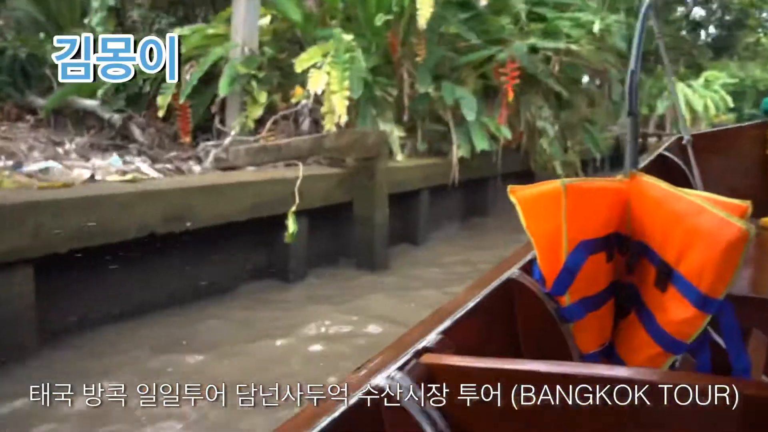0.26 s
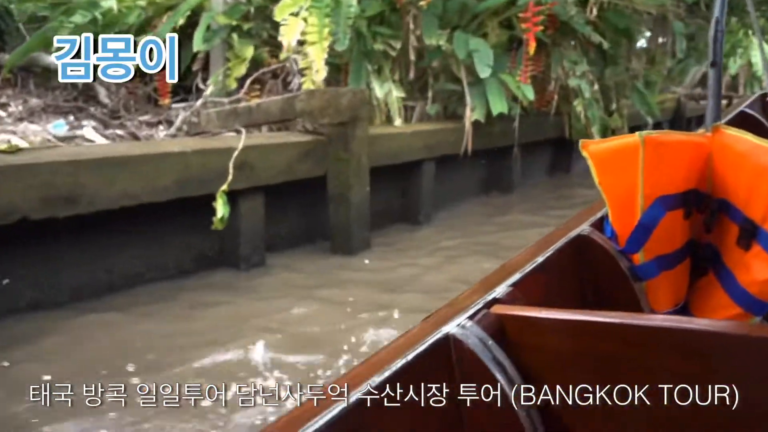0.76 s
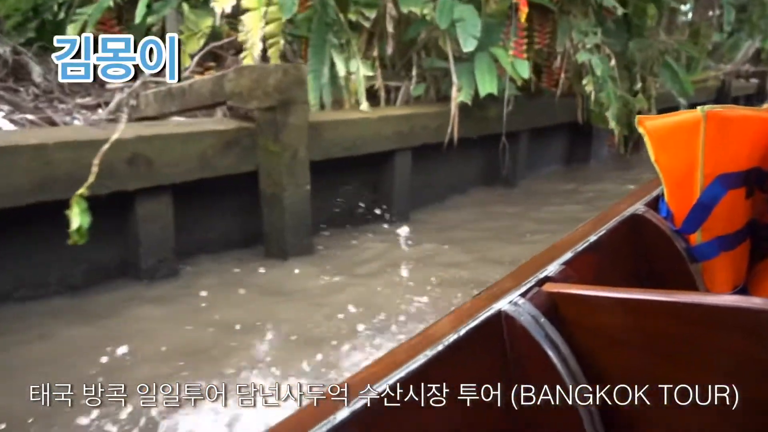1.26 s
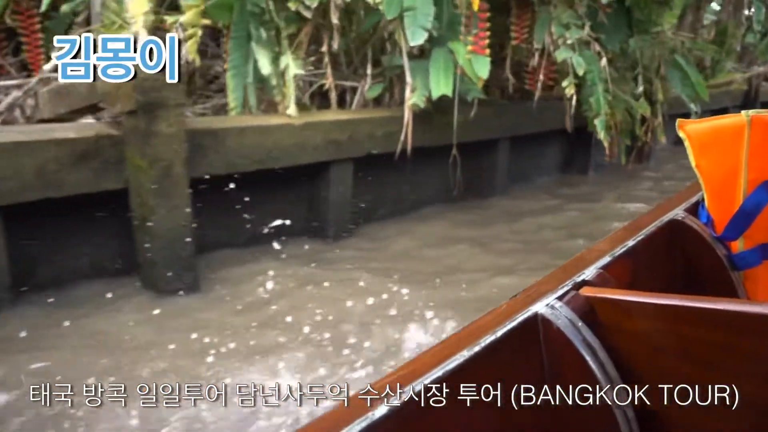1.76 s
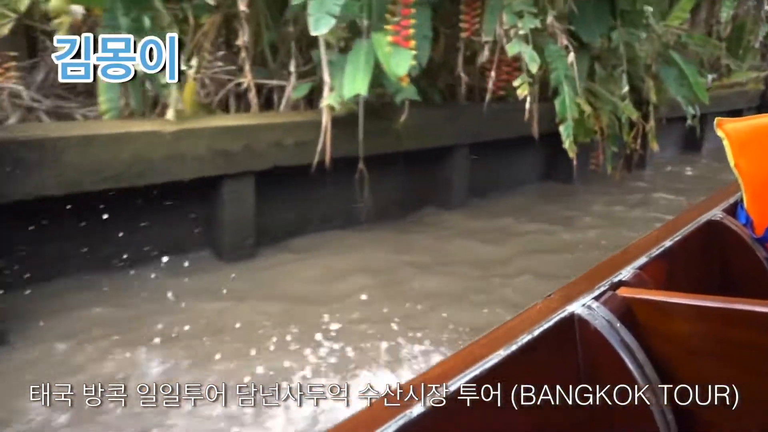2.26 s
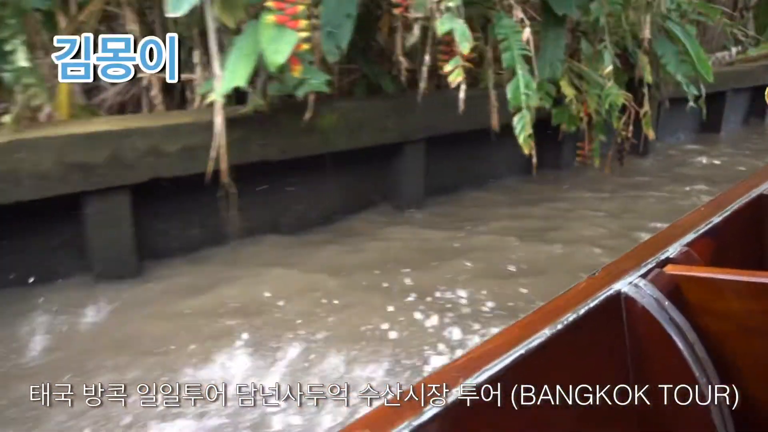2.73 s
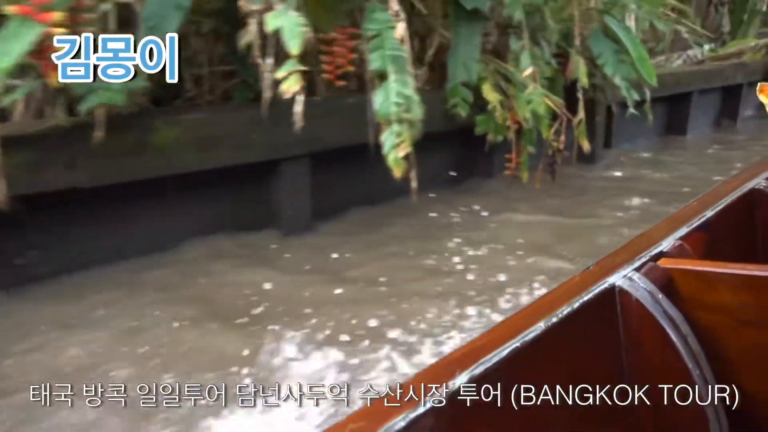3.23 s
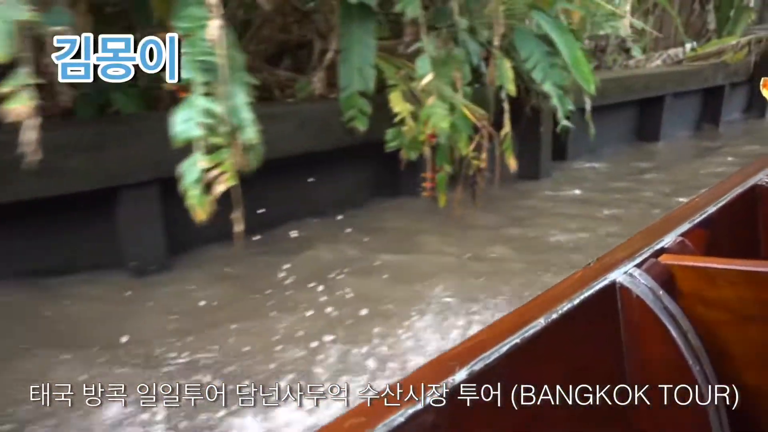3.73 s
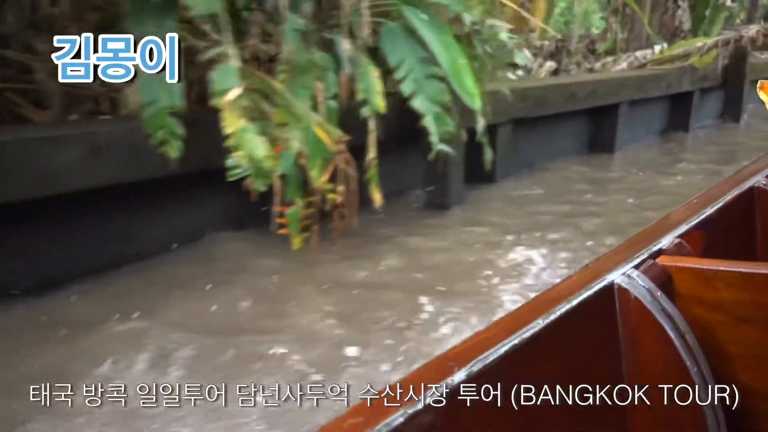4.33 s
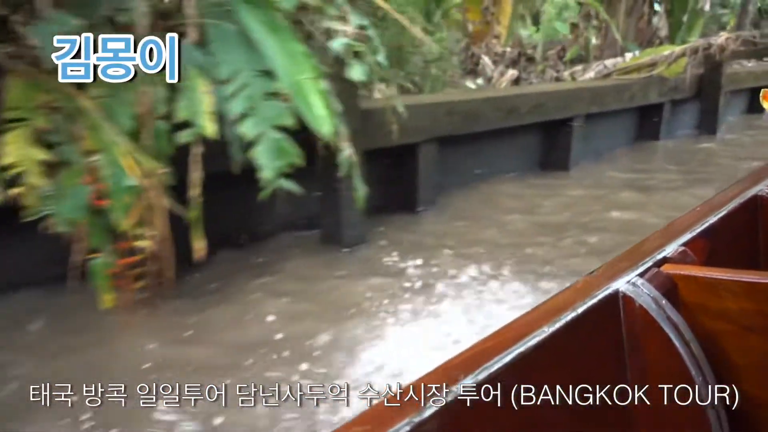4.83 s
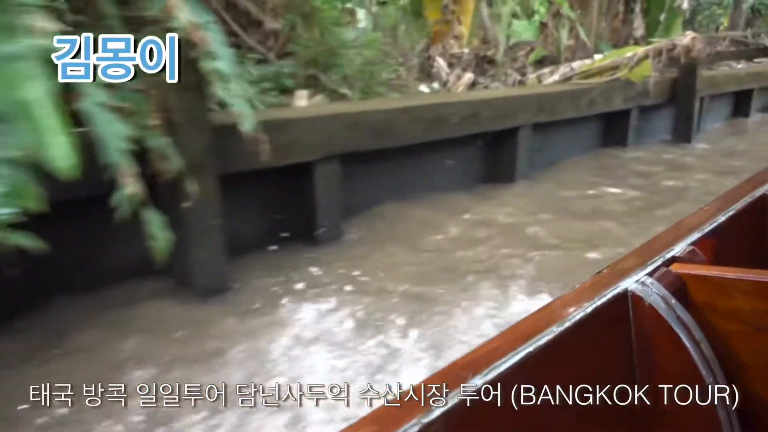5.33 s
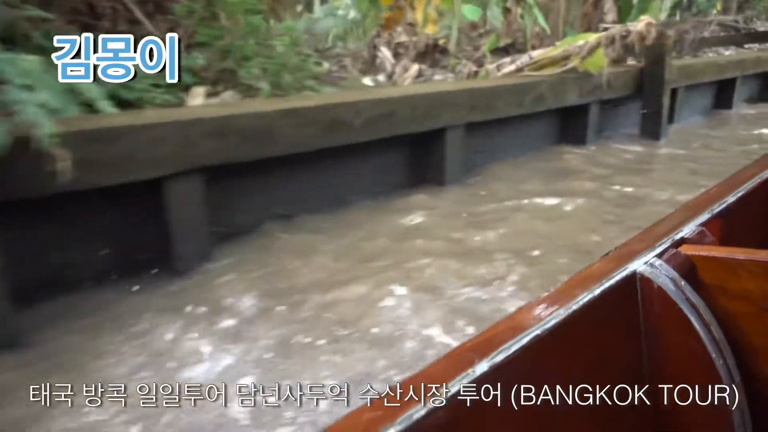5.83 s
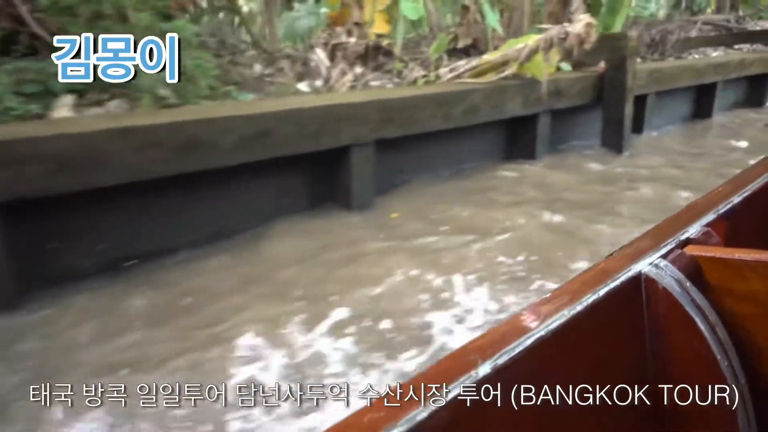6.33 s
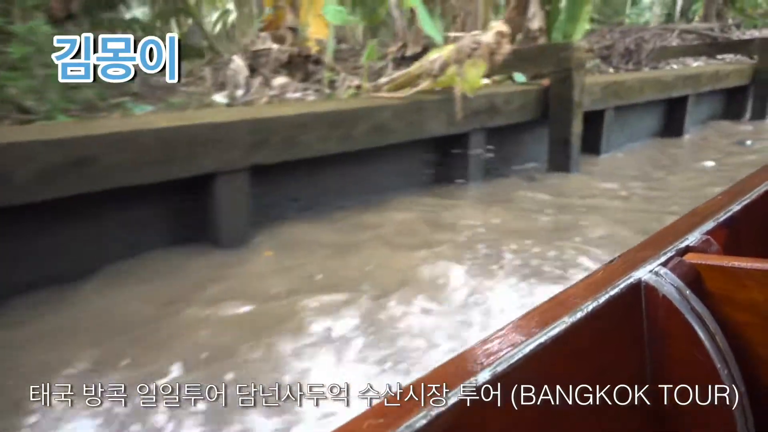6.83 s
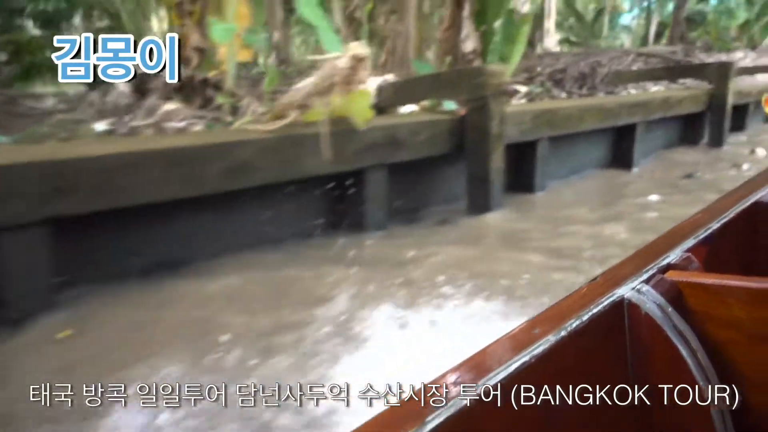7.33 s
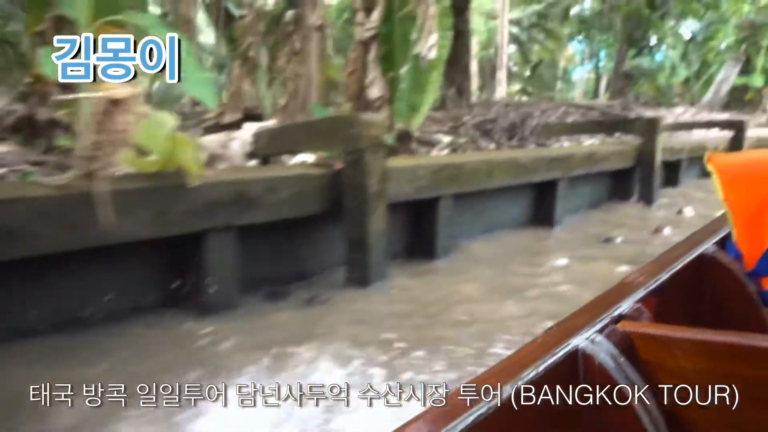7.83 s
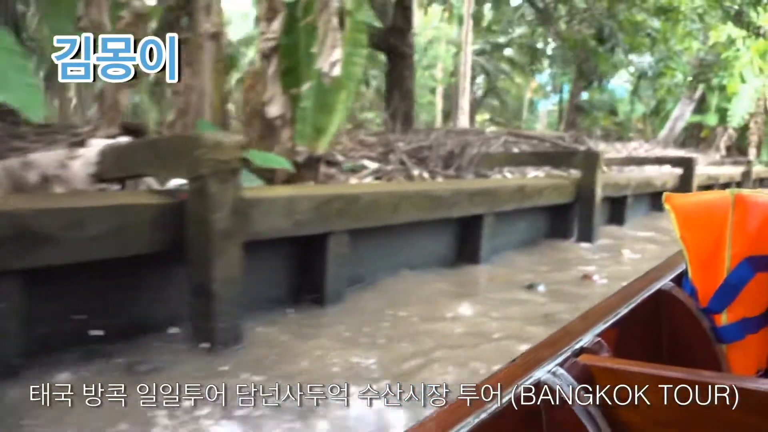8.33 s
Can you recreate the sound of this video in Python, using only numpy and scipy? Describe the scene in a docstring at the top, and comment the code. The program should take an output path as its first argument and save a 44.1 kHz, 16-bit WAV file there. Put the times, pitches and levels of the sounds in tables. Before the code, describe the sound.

Continuous engine noise heard from on board: deep uneven throbbing, hoarse midrange exhaust and a patchy hiss of water against the hull. Small sudden dropouts and surges make it flutter, while low gusts buffet the close handheld microphone. It eases around six seconds, swells from seven to eight with sharp spits of spray, then settles slightly. Top treble is muffled after the opening half second.

```python
"""An engine drones in low orders under a rough exhaust roar, as a long open boat runs along a walled canal.
The drone is a stack of wavering near sines; the roar is pipe-coloured noise, puffed at each firing.
The bow wave rushes and spits beside the hull as noise and chirped droplets, and the head wind buffets
the two ports of a small microphone as low noise. The top treble is open at first and closes within
half a second."""
import sys
import numpy as np
from scipy import signal
from scipy.io import wavfile
from scipy.ndimage import uniform_filter1d

SR = 44100
rng = np.random.default_rng(int(sys.argv[2]) if len(sys.argv) > 2 else 0)


def to_wav(sig):
    """Store sig (one row per channel, or 1-D mono) as 16-bit WAV at the path in sys.argv[1].

    Samples outside -1..1 are clipped; the rate is SR.
    """
    pcm = np.clip(np.atleast_2d(sig), -1, 1) * 32767
    pcm = np.round(pcm).astype(np.int16)
    wavfile.write(sys.argv[1], SR, pcm.T)  # frames by channels


def voltage_ratio(level):
    """Linear amplitude factor for a level in decibels (scalar or array-like)."""
    return 10 ** (np.asarray(level, float) / 20)


N = 377937  # length in samples


def evened(x):
    """Scales to rms 1."""
    return x / np.sqrt(np.mean(np.abs(x) ** 2) + 1e-20)


def read(points, hz):
    """Columns of a table over log frequency."""
    f, *values = np.transpose(points)
    return [np.interp(np.log(hz + 1), np.log(f + 1), v) for v in values]


def play(rows):
    """Columns of a curve over time, one value a sample."""
    s, *values = np.transpose(rows)
    return [np.interp(np.arange(N) / SR, s, v) for v in values]


def wander(seconds):
    """Smooth random drift of rms 1, from noise averaged twice over the given time."""
    width = round(seconds * SR)
    return evened(uniform_filter1d(uniform_filter1d(rng.standard_normal(N), width), width))


def bumps(rows):
    """Sum of bell-shaped bumps in dB."""
    t = np.arange(N) / SR
    return sum(db * np.exp(-((t - s) / max(half_s, .008)) ** 2) for s, db, half_s in rows)


def placed(pair, level_db, pan_db):
    """Level and side of a stereo layer; pan is left minus right."""
    return evened(pair) * voltage_ratio(level_db + np.array([pan_db / 2, -pan_db / 2]))


def tilted(pair, bright_db, pivot_hz, size=1024):
    """Turns the spectrum about a pivot by a moving slope in dB per octave, up to two octaves away."""
    hz, t, z = signal.stft(pair, SR, nperseg=size)
    octaves = np.log2(np.clip(hz / pivot_hz, 1 / 4, 4))
    slope_db = np.interp(t, np.arange(N) / SR, bright_db)
    return signal.istft(z * voltage_ratio(np.outer(octaves, slope_db)), SR, nperseg=size)[1][:, :N]


# The port pair. Each row: frequency in Hz, left-right likeness from 0 to 1, lead of the left in radians.
PORT_PAIR = [(20, .85, .1), (40, .66, .4), (60, .5, 1.2), (90, .55, 1.7), (170, .58, 1.9), (250, .5, 1.4),
             (400, .66, .6), (850, .38, .45), (1200, .1, 1.8), (2000, .32, 3.1), (2450, .3, 3.2),
             (2750, 0, 5.5), (3800, .24, 6.5), (4800, .2, 3.9), (5500, .05, 3.9)]
# The ports differ in colour. Each row: frequency in Hz, left minus right in dB.
PORT_COLOUR = [(20, 1), (60, -1), (130, -1), (200, -1.5), (320, 0), (700, 0.7), (1500, 0.5), (2400, 0.1),
               (3500, 0), (4400, 2.5), (5300, 1.1)]


def ports(left, other, hz):
    """The right port hears part of the same spectrum a little later, and part its own."""
    same, lead = (v[:, None] for v in read(PORT_PAIR, hz))
    same = np.clip(same, 0, 1)
    lean = voltage_ratio(read(PORT_COLOUR, hz)[0][:, None] / 2)
    right = same * np.exp(-1j * lead) * left + np.sqrt(1 - same ** 2) * other
    return np.array([left * lean, right / lean])


def noise(shape, size, patchy_db, patch_hz, patch_s):
    """Random short-time spectra at both ports with drifting loud and soft patches."""
    hop, hz = size // 4, np.fft.rfftfreq(size, 1 / SR)
    a, b, c, d, patches = rng.standard_normal((N // hop + 5, len(hz), 5)).T
    patches = uniform_filter1d(patches, max(round(patch_hz * size / SR), 1), 0)
    patches = evened(uniform_filter1d(patches, max(round(patch_s * SR / hop), 1), 1))
    z = ports(a + 1j * b, c + 1j * d, hz) * shape(hz)[:, None] * voltage_ratio(patchy_db * patches)
    return evened(signal.istft(z, nperseg=size, noverlap=size - hop)[1][:, :N])


# A cycle is two turns of the crank.
# Each row: time in seconds, engine cycle in Hz, base level of the 3rd multiple in dB rms.
ENGINE_SPEED = [(0, 12.7, -43), (.33, 12.6, -23), (.67, 13.1, -25), (1.1, 12.6, -23.5), (1.55, 12.8, -27.5),
                (1.9, 12.5, -29.5), (2.3, 12.8, -24), (2.8, 13, -25.5), (3.3, 12.3, -26), (3.8, 12.3, -33),
                (4.4, 12.2, -25), (4.9, 12, -26.5), (5.5, 12.6, -27.5), (6.3, 13.5, -29),
                (7.1, 13.3, -27.5), (7.55, 12.5, -31), (8, 12.9, -27), (8.57, 13.7, -24)]


def engine():
    """Adds up the speed into a running count of engine cycles, with the base level of the drone."""
    speed_hz, drone_db = play(ENGINE_SPEED)
    return np.cumsum(speed_hz) / SR, drone_db


# The low orders. Each row: multiple of the engine cycle, level in dB against the 3rd.
ORDERS = [(1, -10), (2, -6), (3, 0), (4, -7), (5, -7), (6, -11), (7, -8), (8, -7), (10, -14), (12, -14),
          (16, -12), (20, -16)]
PORT_SWAY = 0.42  # rms radians by which the orders drift between the ports


def drone(cycles, level_db):
    """The low orders shake the hull: near sines that waver, the left port leading."""
    out = np.zeros((2, N))
    sways = PORT_SWAY * np.array([wander(.1), wander(0.088), wander(0.087)])  # shared among the orders
    mean_hz = cycles[-1] * SR / N
    for i, (multiple, db) in enumerate(ORDERS):
        lead = read(PORT_PAIR, multiple * mean_hz)[1] + sways[i % len(sways)]
        turns = multiple * cycles + rng.random() + .045 * multiple * wander(.07)
        phase = 2 * np.pi * turns - np.array([np.zeros(N), lead])
        out += voltage_ratio(level_db + db + 2.2 * wander(.1)) * np.sqrt(2) * np.cos(phase)
    return out


# The roar. Each row: time in seconds, base level in dB rms, base brightness in dB per octave.
ROAR_CURVE = [(0, -18.5, 1.5), (.09, -19, 1.5), (.16, -20, 3), (.27, -21, 1), (.4, -19, 1), (1.1, -21.5, 2),
              (1.45, -26.5, -2), (1.75, -23.5, -0.5), (2.0, -22.5, -1), (2.4, -22, 2), (2.6, -24.5, -0.5),
              (3.15, -20.5, .5), (3.6, -26, -0.5), (4.0, -21.5, 1), (4.45, -20.5, 1.5), (4.7, -23, -1),
              (5.05, -20, 1), (5.6, -21.5, -1), (5.85, -27, 0.5), (6.0, -31, 2.5), (6.25, -28.5, -0.5),
              (6.5, -28, 1.5), (6.85, -22, 0.5), (7.4, -19, 1.5), (7.65, -18.5, 1), (7.8, -17, -0.3),
              (8.05, -18, -0.5), (8.3, -21, 1), (8.57, -22.5, 1.5)]
# Broad colour of the gas. Each row: frequency in Hz, relative density in dB per Hz.
GAS_COLOUR = [(120, -27), (220, -5), (320, 1), (420, -3.5), (650, -4), (900, -10), (1130, -13.5),
              (1250, -13.5), (1800, -21.5), (3000, -37)]
# Pipe resonances. Each row: frequency in Hz, width at half height in Hz, added peak in dB against the gas.
PIPE_PEAKS = [(247, 31, -11), (335.3, 13, -6), (385, 24, -5.5), (467.6, 16, -8.5), (610, 27, -21),
              (850, 97, -7.5), (920, 35, -6.5), (1070, 55, 0.5)]
# The roar surges. Each row: peak time in seconds, rise in dB, half length in seconds.
ROAR_SURGES = [(0.207, 3.5, 0.063), (0.724, 4, 0.055), (0.914, 5, 0.036), (1.055, 2.0, 0.05),
               (1.576, 1.5, 0.03), (1.682, 3, 0.027), (2.63, 3, 0.031), (4.19, 3, 0.071),
               (4.457, 5.5, 0.048), (4.993, 3, 0.055), (5.121, 4, 0.054), (5.436, 3.5, 0.036),
               (5.563, 2.5, 0.032), (6.033, 1.5, 0.03), (6.295, 3, 0.045), (6.518, 1, 0.028),
               (6.815, 2, 0.042), (6.923, 3, 0.04), (7.105, 3.5, 0.029), (7.54, 1, 0.019),
               (7.713, 1.5, 0.055), (7.82, 1, 0.08), (7.942, 2, 0.022), (8.121, 1, 0.028), (2.39, 2, .04),
               (2.83, 2, .04), (3.17, 2, .03), (8.55, 2, .04)]
CYLINDERS = 4
ROAR_PAN_DB, ROAR_DRIFT_DB, ROAR_DRIFT_S = 1.24, 0.6, 0.046  # left minus right, its rms drift and pace
SURGE_TILT_DB = -0.24  # change of brightness per octave for each dB of a surge
ROAR_DIP = 0.79  # share of each sudden dip


def exhaust(cycles, dip_db):
    """Turbulent gas puffed out at each firing, coloured by the pipe; surges are darker."""
    def colour(hz):
        peaks = sum(voltage_ratio(db) / (1 + (2 * (hz - f) / width) ** 2) for f, width, db in PIPE_PEAKS)
        return voltage_ratio(read(GAS_COLOUR, hz)[0]) * (1 + peaks)
    surge_db = bumps(ROAR_SURGES)
    level_db, bright_db = play(ROAR_CURVE)
    level_db = level_db + surge_db - ROAR_DIP * dip_db
    bright_db = bright_db + SURGE_TILT_DB * surge_db
    pan_db = ROAR_PAN_DB + ROAR_DRIFT_DB * wander(ROAR_DRIFT_S)
    firing = CYLINDERS * cycles + 0.16 * wander(0.024)
    burns = voltage_ratio(1.5 * rng.standard_normal(round(firing.max()) + 2))  # uneven from firing to firing
    strength = burns[np.floor(abs(firing)).astype(int)]
    puffs = uniform_filter1d(1 + 0.79 * strength * np.exp(-(firing % 1) / 0.85), size=40)
    gas = noise(colour, size=2048, patchy_db=0.6, patch_hz=120, patch_s=.09)
    return placed(tilted(gas, bright_db, pivot_hz=486) * puffs, level_db, pan_db)


# Brief swells of one note, some low like the drone, some higher.
# Each row: middle in seconds, peak in dB, pitch in Hz, length in seconds between the points at 37 % of the peak.
NOTE_SWELLS = [(2.1, -23.5, 26, 0.36), (2.95, -26, 78, .2), (5.35, -23, 51, 0.32), (5.5, -22, 97, .2),
               (5.78, -21, 40, .14), (5.92, -23, 40, .1), (6.13, -19, 50, .07), (6.35, -20, 55, .09),
               (5.95, -26, 23, 0.28), (6.6, -18, 43, 0.18), (6.9, -19, 31, 0.27), (6.9, -21, 43, 0.22),
               (7.08, -21, 60, .2), (7.25, -20.5, 45, 0.24), (8.4, -26, 56, 0.22), (4.35, -19, 24.64, 0.56),
               (6.903, -21, 21.56, 0.3), (0.92, -23, 461.5, 0.13), (1.07, -20, 254.6, 0.11),
               (3.927, -27.5, 876, 0.088), (4.433, -26.5, 331.6, 0.099), (4.437, -26.5, 1063, 0.095),
               (5.046, -22.5, 330.6, 0.11), (5.06, -27.5, 850, 0.13), (5.442, -22, 515, 0.076),
               (6.129, -26, 115, .15), (7.53, -25, 300, .06), (7.72, -23, 645, 0.08), (7.2, -26, 835, 0.1),
               (7.37, -25.5, 835, .13), (7.33, -28, 920, .07), (7.36, -32, 1150, .14),
               (7.31, -25, 385, .08), (7.535, -27, 1005, .06), (7.71, -23, 245, .08), (6.93, -23, 365, .07),
               (0.72, -23, 600, .07), (7.655, -21, 385, 0.09), (7.61, -22, 295, .06), (8.02, -22, 385, .05),
               (7.93, -22, 350, .06), (7.842, -15.5, 512, 0.075), (8.052, -16, 102, 0.2)]


def note_swells():
    """Short sines of one note each, fading in and out, the left port leading."""
    out = np.zeros((2, N))
    for s, db, hz, length in NOTE_SWELLS:
        at = np.arange(max(round((s - 2 * length) * SR), 0), min(round((s + 2 * length) * SR), N))
        lead = np.array([[0], [read(PORT_PAIR, hz)[1]]])
        swell = np.exp(-(2 * (at / SR - s) / length) ** 2)
        out[:, at] += voltage_ratio(db) * swell * np.sin(2 * np.pi * hz * at / SR - lead)
    return out


# Roar and rush drop away suddenly and creep back.
# Each row: time in seconds, depth in dB before each layer takes its share, recovery time constant in seconds.
SUDDEN_DIPS = [(0.1, 6.5, 0.081), (0.222, 5, 0.05), (.31, 2, .03), (0.355, 4, 0.037), (0.551, 7, 0.047),
               (0.787, 7, 0.06), (1.119, 8.5, 0.055), (1.365, 3, .04), (1.485, 2, 0.032), (1.605, 8, 0.032),
               (1.688, 3, 0.05), (2.482, 5.5, 0.074), (2.554, 6, 0.07), (2.655, 3, .04), (2.858, 1, 0.056),
               (2.97, 3.5, 0.073), (3.2, 6.5, 0.066), (3.498, 5.5, 0.067), (3.53, 0.5, 0.049),
               (3.961, 3.5, 0.069), (4.193, 2, 0.34), (4.619, 7, 0.066), (4.818, 9, 0.07),
               (5.147, 5, 0.068), (5.273, 4.5, 0.054), (5.359, 3.5, 0.07), (5.628, 5, 0.045),
               (6.318, 6, 0.08), (6.36, 3.5, 0.091), (6.41, 2, 0.077), (6.935, 3.5, 0.08),
               (6.978, 4.5, 0.051), (7.12, 8, 0.04), (7.15, 5.5, 0.023), (7.23, 7, 0.038),
               (7.448, 6, 0.037), (7.581, 3, 0.055), (7.65, 3, .04), (7.872, 4.5, 0.067),
               (8.147, 3.5, 0.05), (8.435, 3, .04)]
DIP_HALF_FALL_S = 0.0082


def dips():
    """Depth in dB: a quick fall, then a slow exponential return."""
    depth_db = np.zeros(N)
    for s, db, back_s in SUDDEN_DIPS:
        after = np.arange(N) / SR - s
        fall = np.clip(.5 + after / (2 * DIP_HALF_FALL_S), 0, 1)
        depth_db += db * fall * np.exp(-np.maximum(after, 0) / max(back_s, .01))
    return depth_db


def droplet(hz, cycles):
    """A short rising chirp of a few cycles, as a drop bursting."""
    t = np.arange(round(cycles * SR / hz)) / SR
    return np.hanning(len(t)) * np.sin(2 * np.pi * hz * t * (1 + 0.11 * t * hz / cycles))


# The bow wave. Each row: time in seconds, base level in dB rms, base brightness in dB per octave.
WAVE_CURVE = [(0, -25, -3.5), (.08, -25.5, -4), (.13, -26, -2), (.2, -34, -1.5), (.28, -35, -0.5),
              (.5, -28, 0), (1.1, -27.5, -0.5), (1.45, -33, 0.5), (2.1, -32.5, -3.5), (2.4, -32, 4),
              (2.7, -31.5, -2), (3.2, -32, -3), (3.7, -31.5, 1), (4.15, -28.5, 0.5), (5.05, -26.5, 1.5),
              (5.45, -31.5, -1.5), (6.0, -33.5, 0.5), (6.9, -24.5, 0.5), (7.4, -25.5, -2),
              (7.85, -25.5, -2), (8.57, -31.5, 1.5)]
# Colour of the rush. Each row: frequency in Hz, relative density in dB per Hz.
RUSH_COLOUR = [(400, -14.5), (900, 3), (1500, 10.5), (1900, 7.5), (2300, 6.5), (2650, 6), (3000, 5),
               (4000, 2.5), (5200, 3.5), (6500, -7), (8000, -18), (12000, -20), (14000, -22), (16000, -29)]
WAVE_DIP, DIP_TILT_DB = 1.73, 0.25  # share of each dip, dulling in dB per octave for each dB of its depth


def water(dip_db):
    """A patchy rush of noise with a fizz of randomly bursting droplets on top."""
    level_db, bright_db = play(WAVE_CURVE)
    level_db, bright_db = level_db - WAVE_DIP * dip_db, bright_db - DIP_TILT_DB * dip_db
    rush = noise(lambda hz: voltage_ratio(read(RUSH_COLOUR, hz)[0]), size=512, patchy_db=1.26, patch_hz=600, patch_s=.04)
    fizz = np.zeros((2, N))
    for hz in np.geomspace(900, 5400, num=16):
        bursts = rng.random((2, N)) < 60. / SR  # about 60 a second at each pitch and port
        sizes = voltage_ratio(2.8 * np.minimum(rng.exponential(1, (2, N)), 5)) * bursts
        fizz += signal.oaconvolve(sizes, droplet(hz, cycles=4.76)[None], axes=1)[:, :N]
    wave = tilted(rush + voltage_ratio(-9.0) * evened(fizz), bright_db, pivot_hz=2950)
    return placed(wave, level_db, np.zeros(N))


# Sharp spits of spray and lower slaps of water near the microphone.
# Each row: start in seconds, peak in dB, starting pitch in Hz, left minus right in dB.
SPRAY_SPITS = [(2.4715, -22, 4793, 0), (2.9575, -23, 2240, 1), (4.5984, -34, 2902, 7),
               (4.7605, -14.5, 675, 1), (6.0955, -22, 669.6, .5), (7.691, -14, 638.4, 0),
               (7.8495, -11, 4130, 3)]


def spits():
    """Single drops that burst close by, each one chirp."""
    out = np.zeros((2, N + SR))
    for s, db, hz, pan_db in SPRAY_SPITS:
        drop = droplet(hz, cycles=3.9)
        out[:, round(s * SR):][:, :len(drop)] += voltage_ratio(db + np.array([[pan_db / 2], [-pan_db / 2]])) * drop
    return out[:, :N]


# Short broad bands of noise, each sliding in pitch.
# Each row: start in seconds, length in seconds, level in dB rms before the fades, first and last pitch in Hz.
NOISE_BANDS = [(0, .105, -31, 3000, 2800), (0, .105, -28.5, 1950, 1800), (.115, .11, -33, 1800, 1500),
               (.23, .13, -35, 1700, 1600), (.11, .11, -35, 2700, 2400), (0, .105, -27.5, 1050, 950),
               (7.5, .3, -26.5, 880, 900), (4.95, .22, -29, 1000, 890), (8, .25, -28, 750, 640)]
BAND_WIDTH, BAND_RISE_S = 0.43, .02  # width of each pole as a share of the last pitch, rise time


def noise_bands():
    """Noise in one broad sliding resonance: a quick rise, then a fall that steepens."""
    out = np.zeros((2, N + SR))
    for s, length, db, first_hz, last_hz in NOISE_BANDS:
        t = np.arange(round(length * SR)) / SR
        turn = np.exp(2j * np.pi * np.cumsum(first_hz + (last_hz - first_hz) * t / length) / SR)
        r = np.exp(-np.pi * BAND_WIDTH * last_hz / SR)
        # noise is shifted down, low-passed by two equal poles, and shifted back up to the sliding pitch
        low = signal.lfilter([1], np.convolve([1, -r], [1, -r]), rng.standard_normal((2, len(t))) / turn)
        band = evened((turn * low).real)
        fade = np.minimum(t / BAND_RISE_S, 1) * np.sqrt(1 - (t / length) ** 3.5)
        out[:, round(s * SR):][:, :len(t)] += voltage_ratio(db) * fade * band
    return out[:, :N]


# Single buffets thump the ports. Each row: peak time in seconds, rise in dB, half length in seconds.
WIND_THUMPS = [(0.155, 3.4, 0.025), (0.382, 5.6, 0.022), (0.571, 3.9, 0.035), (0.821, 5.5, 0.02),
               (1.136, 3.1, 0.025), (1.956, 4.4, 0.023), (2.462, 5.1, 0.026), (2.561, 3.5, 0.025),
               (2.833, 3.9, 0.024), (2.941, 3.2, 0.051), (3.169, 3.7, 0.027), (3.476, 2.9, 0.021),
               (4.213, 5.8, 0.029), (4.58, 2.9, 0.059), (4.641, 2.9, 0.059), (4.929, 4.8, 0.021),
               (5.161, 3.5, 0.023), (5.591, 3.5, 0.034), (5.756, 3.8, 0.022), (6.027, 5.6, 0.033),
               (6.09, 5.7, 0.034), (6.361, 3.8, 0.023), (6.429, 3.4, 0.015), (6.702, 5.4, 0.031),
               (6.98, 3.4, 0.022), (7.145, 5.2, 0.04), (7.446, 5.4, 0.022), (7.589, 5.1, 0.025),
               (7.935, 3.0, 0.024), (8.052, 4.4, 0.023), (8.191, 4.2, 0.021), (8.465, 4.3, 0.018),
               (8.566, 3.8, 0.016)]
# The air falls slack for a moment. Each row: middle in seconds, fall in dB, half length in seconds.
WIND_LULLS = [(.732, 8, .04), (1.036, 4, .02), (1.513, 4, .02), (1.774, 10, .022), (2.256, 9, .02),
              (2.355, 6, .018), (2.666, 4, .024), (2.751, 4, .028), (3.115, 4, .036), (3.589, 5, .02),
              (3.911, 4, .04), (4.274, 10, .025), (4.407, 6, .043), (4.856, 5, .028), (5.036, 5, .03),
              (5.396, 5, .02), (5.867, 11, .045), (5.95, 5, .04), (6.314, 5, .018), (6.527, 5, .023),
              (6.635, 5, .05), (7.83, 6, .035), (8.298, 4, .03), (8.5, 7, .018)]


def buffets():
    """Change of level in dB as the air thumps and slackens."""
    return bumps(WIND_THUMPS) - bumps(WIND_LULLS)


# Buffeting. Each row: time in seconds, base level in dB rms.
GUST_CURVE = [(0, -20.5), (.35, -20), (.6, -15.5), (.75, -19), (1.2, -20), (1.7, -20.5), (2.0, -15),
              (2.4, -21.5), (2.8, -18), (3.5, -19), (4.2, -17), (4.6, -24), (5.1, -18), (5.55, -19),
              (5.9, -27.5), (6.15, -16.5), (6.55, -23), (6.8, -19), (7.15, -16.5), (7.8, -20),
              (8.05, -17.5), (8.45, -22), (8.57, -14)]
# Colour of the buffeting. Each row: frequency in Hz, relative density in dB per Hz.
BUFFET_COLOUR = [(6, -25.5), (15, -13.5), (30, -8.5), (50, -1), (90, 0), (150, -0.5), (250, -5.5),
                 (400, -20.5), (800, -31.5)]
LUMPY_DB, LUMP_S, WIND_DRIFT_DB = .8, 0.031, 1.5  # rms lumps of level, their pace, rms drift between ports
# usual level, brightness in dB per octave there, and its change for each dB above
CALM_DB, WIND_TILT_DB, GUST_TILT_DB = -20.5, -1.1, -0.18


def wind(thump_db):
    """Lumpy low turbulence over the ports; stronger gusts are heavier in the bass."""
    level_db = play(GUST_CURVE)[0] + LUMPY_DB * wander(LUMP_S)
    bright_db = WIND_TILT_DB + GUST_TILT_DB * (level_db - CALM_DB)
    lumps = noise(lambda hz: voltage_ratio(read(BUFFET_COLOUR, hz)[0]), size=4096, patchy_db=1.47, patch_hz=60, patch_s=.06)
    lumps = tilted(lumps, bright_db, pivot_hz=81, size=4096)
    return placed(lumps, level_db + thump_db, WIND_DRIFT_DB * wander(LUMP_S))


HULL_SHARE = .35  # how much of each thump and lull the drone follows


def scene():
    """Engine, water and wind; the roar and the rush flutter together in level."""
    cycles, drone_db = engine()
    dip_db, thump_db = dips(), buffets()
    flutter = voltage_ratio(0.3 * wander(0.027) + 0.72 * wander(0.013))
    fluttering = flutter * (exhaust(cycles, dip_db) + water(dip_db) + noise_bands())
    hull = drone(cycles, drone_db + HULL_SHARE * thump_db)
    return hull + fluttering + note_swells() + spits() + wind(thump_db)


KNEE_DB, SQUEEZE, RECOVERY_DB_PER_S = -13, .45, 170  # threshold, share of the excess taken off, release
MAKEUP_DB = 2.5


def limited(dry):
    """A quick limiter ducks both ports under loud lumps: a held peak sinks steadily until the next."""
    peak_db = 20 * np.log10(abs(dry).max(0) + 1e-6)
    fall = np.arange(N) * RECOVERY_DB_PER_S / SR
    over_db = np.maximum(np.maximum.accumulate(peak_db + fall) - fall - KNEE_DB, 0)
    return dry * voltage_ratio(MAKEUP_DB - SQUEEZE * uniform_filter1d(over_db, size=120))


# Top of the treble. Each row: time in seconds, frequency in Hz.
TREBLE_TOP = [(0, 16000), (.055, 15600), (.08, 13000), (.12, 11900), (.15, 10400), (.21, 8850), (.26, 8000),
              (.35, 6700), (.383, 5587), (9, 5656)]
STEP_S = 2048 / SR  # the top closes in small stairs


def closing_treble(held):
    """A moving low-pass: a slope just under the top, then a hard edge that flickers."""
    hz, t, z = signal.stft(held, SR, nperseg=1024, noverlap=768)
    flicker_hz = 45 * np.tanh(3 * wander(.04)[::256])  # the very top comes and goes
    top_hz = np.interp(np.floor(t / STEP_S + .5) * STEP_S, *np.transpose(TREBLE_TOP))
    room_hz = top_hz - hz[:, None]
    slope = voltage_ratio(-21 * np.clip(1 - room_hz / 380, 0, 1))
    passed = room_hz + np.resize(flicker_hz, len(t)) > 45
    return signal.istft(z * slope * passed, SR, nperseg=1024, noverlap=768)[1][:, :N]


def band_limit(x):
    """A steep low-pass at the top of the band."""
    return signal.sosfilt(signal.butter(12, 16000, fs=SR, output="sos"), x)


def record(dry):
    """The limiter ducks loud lumps, then the treble closes down."""
    mix = closing_treble(limited(dry))
    return band_limit(mix)


dry = scene()
out = record(dry)
to_wav(out)
```